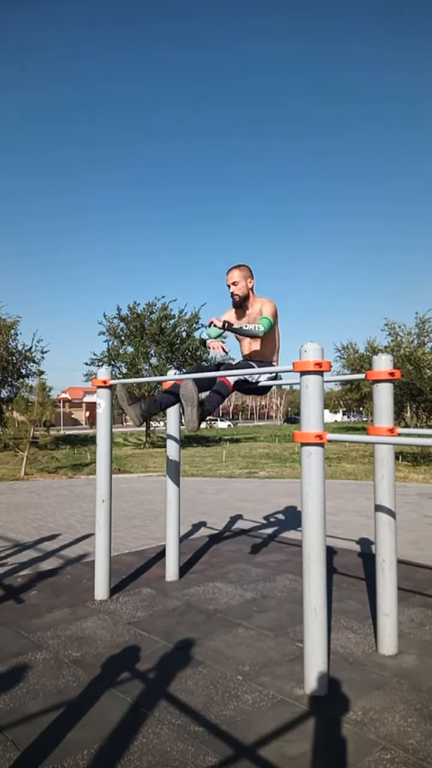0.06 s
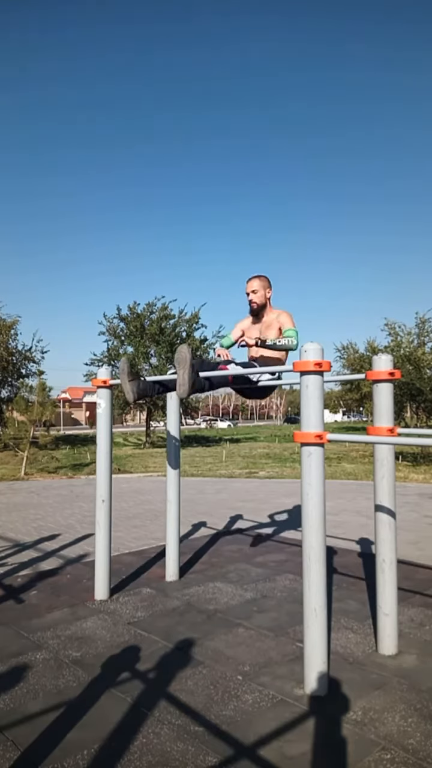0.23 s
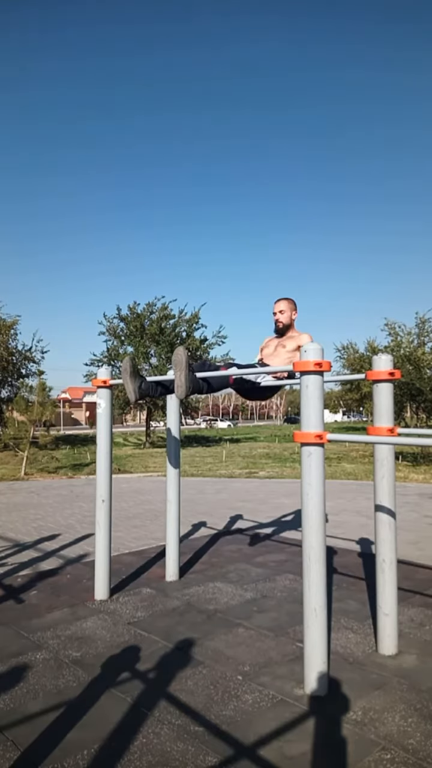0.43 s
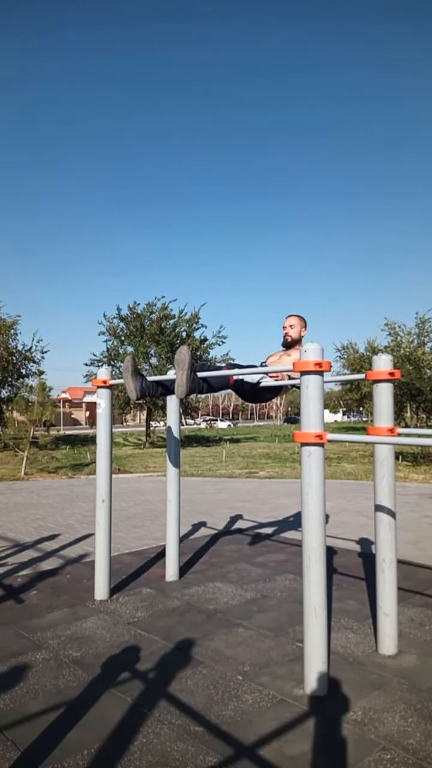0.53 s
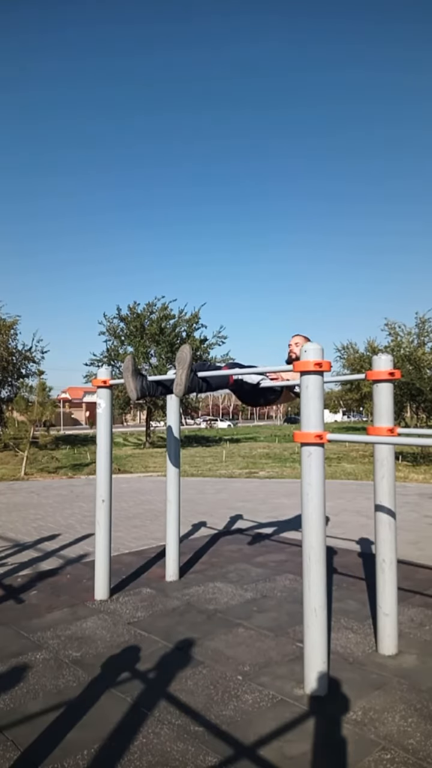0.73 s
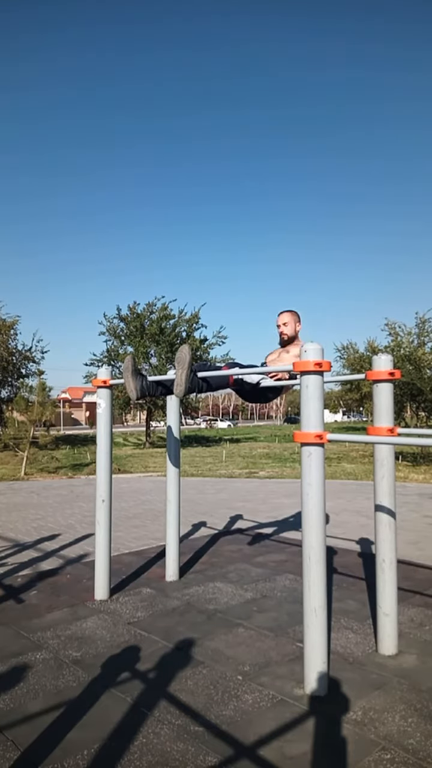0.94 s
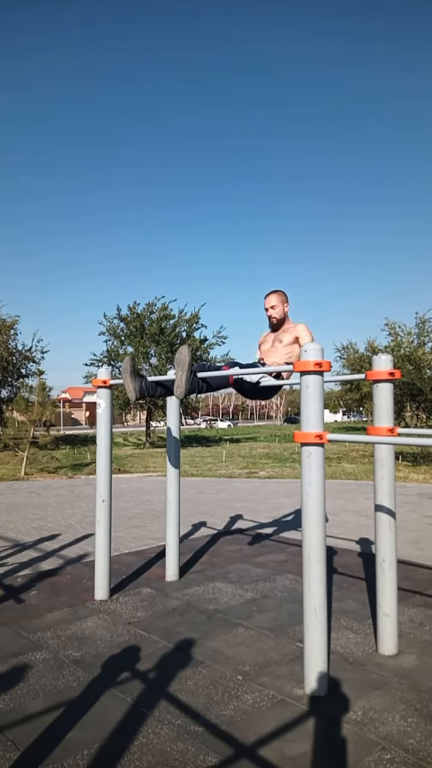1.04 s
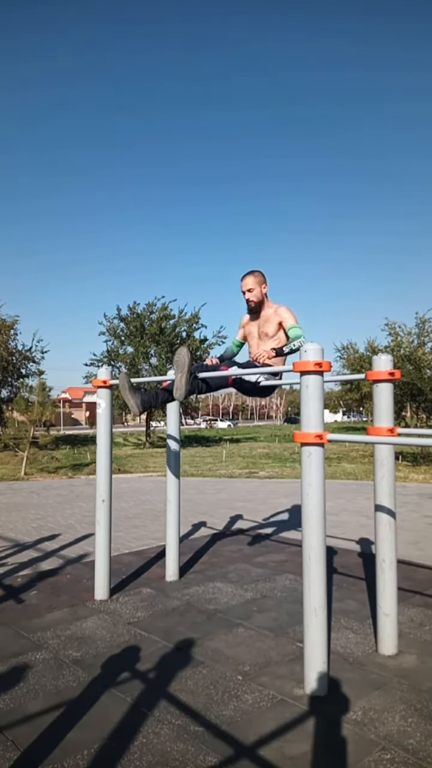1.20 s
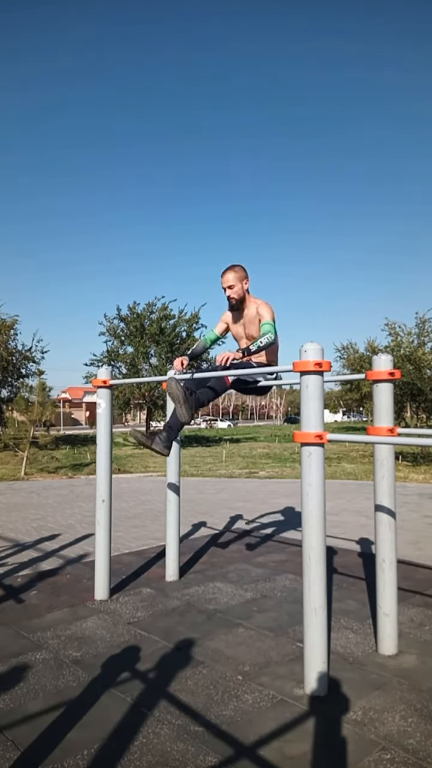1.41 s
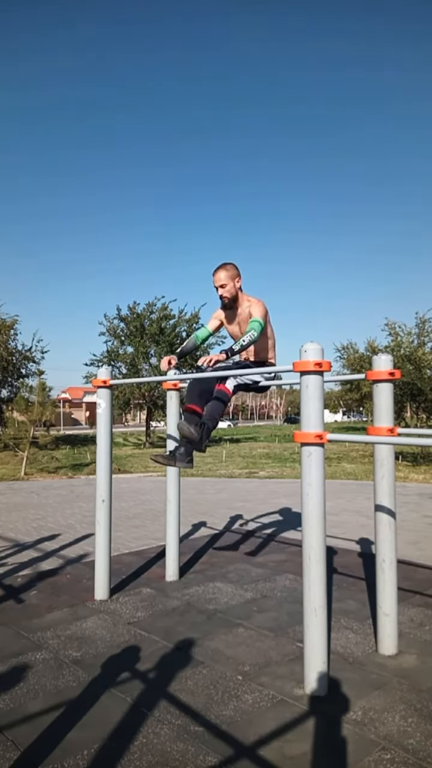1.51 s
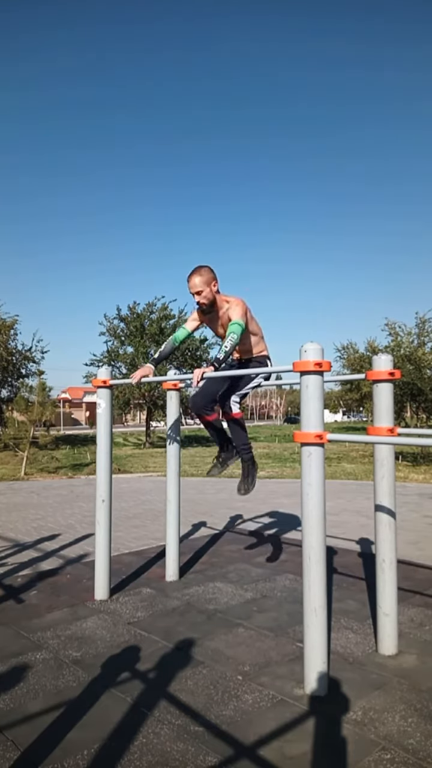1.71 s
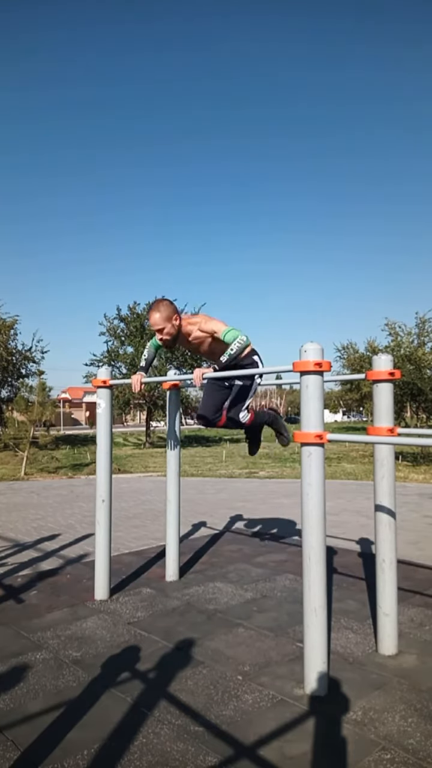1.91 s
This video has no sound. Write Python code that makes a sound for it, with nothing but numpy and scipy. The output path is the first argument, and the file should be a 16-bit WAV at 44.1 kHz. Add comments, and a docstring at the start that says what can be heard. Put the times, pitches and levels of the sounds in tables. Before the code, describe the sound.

A quick double metallic clatter of hollow parallel bars, the second knock louder, fades into a short ring. Low distant traffic and soft hiss continue outdoors, with small dry ticks and a high clink late; single-channel, little echo.

```python
"""Steel parallel bars in a park

An athlete drops back onto steel parallel bars: the bars clank in their loose clamps, shudder,
then knock home and ring briefly. A small metal piece clinks near the end, and very faintly early on.
Metal sounds are sums of dying sine waves and bursts of coloured noise, with a faint echo added.
Distant traffic rumbles and hisses underneath, made of noise whose level keeps changing."""
import sys
import numpy as np
from scipy import signal
from scipy.fft import rfft, irfft
from scipy.io import wavfile
from scipy.ndimage import uniform_filter1d

SR = 44100  # samples per second
rng = np.random.default_rng(int(sys.argv[2]) if len(sys.argv) > 2 else 0)


def to_wav(sig):
    """Store sig (one row per channel, or 1-D mono) as 16-bit WAV at the path in sys.argv[1].

    Samples outside -1..1 are clipped; the rate is SR.
    """
    pcm = np.clip(np.atleast_2d(sig), -1, 1) * 32767
    pcm = np.round(pcm).astype(np.int16)
    wavfile.write(sys.argv[1], SR, pcm.T)  # frames by channels


N = 85995  # length of the scene in samples

# In all tables, t60 is the time a sound takes to die away by 60 dB.


def amp(db):
    """Turn decibels into a gain."""
    return 10 ** (np.asarray(db) / 20)


def unit(x):
    """Scale a sound to an average (rms) strength of 1."""
    return x / np.sqrt(np.mean(x ** 2) + 1e-20)


def along(points, hz):
    """Read a curve of (frequency, value) points, with frequency on a log axis."""
    point_hz, values = np.transpose(points)
    return np.interp(np.log(hz + 1), np.log(point_hz + 1), values)


def level(rows):
    """Turn (time, level in dB) points into a gain for every sample."""
    seconds = np.arange(N) / SR
    return amp(np.interp(seconds, *np.transpose(rows)))


def tilt(hz, slope_db):
    """Brighten for a harder contact or darken for a softer one, in dB per octave around 1500 Hz."""
    octaves = np.log2(np.clip(hz, 400, 5000) / 1500)
    return amp(slope_db * octaves)


def noise(spectrum, slope_db=0):
    """Shape random noise with a colour curve and a tilt, then scale it to rms 1."""
    hz = np.fft.rfftfreq(N, 1 / SR)
    white = rfft(rng.standard_normal(N))
    coloured = white * amp(along(spectrum, hz)) * tilt(hz, slope_db)
    return unit(irfft(coloured, N))


def fade(t, t60):
    """Die away exponentially, falling 60 dB in t60 seconds."""
    return np.exp(-np.log(1000) * t / t60)


def rise(t, seconds):
    """Start softly; the given seconds are the time constant of the attack."""
    return 1 - np.exp(-t / max(seconds, 1e-4))


def ring(t, hz, t60):
    """One dying mode (a pure tone of the metal), starting at a random phase."""
    return np.sin(2 * np.pi * (hz * t + rng.random())) * fade(t, t60)


def die_by_band(x, t60s):
    """Let each frequency of a sound die at its own speed."""
    hz, t, bands = signal.stft(x, SR, nperseg=256)
    t60 = along(t60s, hz)[:, None]
    return signal.istft(bands * fade(t, t60), SR, nperseg=256)[1][:len(x)]


def add(track, s, sound):
    """Mix a sound into the track, starting at time s in seconds."""
    i = round(s * SR)
    track[i:i + len(sound)] += sound[:N - i]


def patchy(x, depth_db):
    """Let each region of the spectrum swell and sink on its own."""
    bands = signal.stft(x, nperseg=512)[2]
    field = rng.standard_normal(bands.shape)
    field = uniform_filter1d(field, size=6, axis=0)  # smooth across frequency
    field = uniform_filter1d(field, size=10, axis=1)  # smooth across time
    gains = amp(depth_db * unit(field))
    return unit(signal.istft(bands * gains, nperseg=512)[1][:N])


def traffic():
    """A narrow, swelling rumble under the soft hiss of far roads and leaves."""
    # how the rumble swells: (time [s], level [dB])
    rumble_level = [(0.0, -50.5), (0.336, -62), (0.362, -58), (0.472, -61), (0.542, -54), (0.57, -62),
                    (0.732, -55), (0.754, -62), (1.026, -48.5), (1.052, -57.5), (1.194, -53), (1.21, -57.5),
                    (1.27, -51), (1.656, -59.5), (1.814, -47), (1.868, -63), (1.922, -56.5), (1.95, -61)]
    # colour of the rumble: (frequency [Hz], relative level per Hz [dB])
    rumble_colour = [(20, -25), (42, -19.5), (62, -11.5), (78, 4.5), (95, -5.5), (122, -8), (155, -16),
                     (210, -23), (400, -66)]
    # how the hiss changes: (time [s], level [dB])
    hiss_level = [(0, -58.5), (.2, -60.5), (.7, -60), (.9, -60.5), (1.1, -58.5), (1.32, -58.5),
                  (1.62, -58.5), (1.95, -59)]
    # colour of the hiss: (frequency [Hz], relative level per Hz [dB])
    hiss_colour = [(30, -29.5), (170, 9.5), (340, -1.5), (600, 1.5), (1100, 0.5), (1800, -2), (3000, -10),
                   (4500, -15), (6500, -14), (7400, -29), (8600, -45), (10800, -32), (13200, -62),
                   (15300, -27)]
    rumble = noise(rumble_colour)
    # even out the noise's own swells, so that the level table sets them
    own_swell = np.sqrt(np.abs(uniform_filter1d(rumble ** 2, size=2200)) + 1e-6)
    steady_rumble = rumble / own_swell
    hiss = patchy(noise(hiss_colour), depth_db=1.75)
    return level(rumble_level) * steady_rumble + level(hiss_level) * hiss


def park(x):
    """Ground, posts and trees scatter a weak echo tail, made of dying noise."""
    # how fast the echo dies: (frequency [Hz], t60 [s])
    echo_t60 = [(200, 0.23), (1000, 0.29), (3000, 0.22), (8000, 0.46)]
    tail = die_by_band(rng.standard_normal(SR // 2), echo_t60)
    return signal.fftconvolve(x, tail / np.linalg.norm(tail))[:N]


def ticks():
    """Short, dry ticks of the bars under a shifting grip: bursts of dying noise."""
    # the faint ticks: (time [s], level [dB])
    tick_times = [(1.718, -61), (1.875, -61)]
    # colour of a tick: (frequency [Hz], relative level per Hz [dB])
    tick_colour = [(2500, -28), (4500, -4), (6300, 8), (7200, -16), (8500, -30), (15000, -32)]
    out, t = np.zeros(N), np.arange(SR // 10) / SR
    for s, db in tick_times:
        burst = noise(tick_colour)[:len(t)] * fade(t, t60=0.061)
        add(out, s, amp(db) * burst)
    return out


def clinks():
    """A small piece of metal touches the bar: high, short modes and a little noisy scrape."""
    # the touches: (time [s], level [dB])
    touches = [(0.309, -63.5), (1.8232, -60), (1.828, -49)]
    # tones of the small piece: (frequency [Hz], relative level [dB], t60 [s])
    clink_modes = [(6023, 1.5, 0.11), (7200, 4.5, .03), (7500, -8, 0.089), (8300, -9.5, 0.11),
                   (9787, -6, .05), (10920, -9, 0.037), (12000, -18, .055), (15530, -19, 0.054)]
    # colour of the scrape: (frequency [Hz], relative level per Hz [dB])
    scrape_colour = [(2000, -30), (5000, -3), (5950, 6), (7300, -1), (8700, -9), (11800, -3), (13300, -29),
                     (14400, -14), (15500, 2.5)]
    scrape_db, scrape_t60, rise_s = 3.5, 0.066, 0.00085
    out, t = np.zeros(N), np.arange(SR // 4) / SR
    for s, db in touches:
        tones = sum(amp(mode_db) * ring(t, hz, t60) for hz, mode_db, t60 in clink_modes)
        scrape = amp(scrape_db) * noise(scrape_colour)[:len(t)] * fade(t, scrape_t60)
        add(out, s, amp(db) * rise(t, rise_s) * (tones + scrape))
    return out


def mode(t, hz, t60, swell_s):
    """One mode that swells from rest as the blow spreads through the frame, then dies."""
    return np.sin(2 * np.pi * hz * t) * fade(t, t60) * rise(t, swell_s) ** 2


def clatter(t, slope_db):
    """The dense, quickly dying rattle of one contact in a clamp, made of noise."""
    # colour of the rattle: (frequency [Hz], relative level per Hz [dB])
    clatter_colour = [(100, -50), (260, -9.5), (410, -10.5), (540, 4.5), (680, -8.5), (800, -1.5),
                      (900, -11.5), (1080, 3.5), (1270, -7.5), (1600, -0.5), (2450, -2.5), (3200, -2),
                      (4300, -5), (5300, -7), (6350, -2), (7400, -24), (8800, -36.5), (11000, -34),
                      (13500, -53), (15500, -39)]
    # how fast it dies: (frequency [Hz], t60 [s])
    clatter_t60 = [(300, 0.17), (900, 0.33), (1800, 0.15), (5000, 0.089), (12000, 0.17)]
    return die_by_band(noise(clatter_colour, slope_db)[:len(t)], clatter_t60)


def cluster(t, hz, spread_hz, t60, count):
    """Close modes that beat against each other, or a lone one if there is no spread."""
    if spread_hz < 1:
        return ring(t, hz, t60)
    places = (np.arange(count) + rng.random(count)) * 2 / count - 1  # scattered from -1 to 1
    return sum(ring(t, hz + spread_hz * place, t60) for place in places) / np.sqrt(count)


def bar_ring(t, ring_db, slope_db):
    """The bar's long ring: clusters of close modes that start softly together."""
    # the clusters: (frequency [Hz], spread to each side [Hz], relative level [dB], t60 [s])
    bar_clusters = [(1940, 35.5, -19.5, 0.76), (2067, 29.5, -22.5, 0.78), (2286, 0, -15.5, 0.53),
                    (2360, 47.5, -22, 0.82), (3764, 120, -17, 0.44), (4740, 54.5, -38, 0.99),
                    (6100, 149, -8.5, 0.22), (6460, 84, -28, 0.2)]
    total = np.zeros(len(t))
    for hz, spread_hz, db, t60 in bar_clusters:
        gain = amp(db + ring_db) * tilt(hz, slope_db)
        total += gain * cluster(t, hz, spread_hz, t60, count=7)
    return total * rise(t, 0.0047)


def knocks():
    """Each blow rattles the clamp, rings the frame by its kind of contact and sets the bar singing."""
    # blows of the bar in its clamps: (time [s], level [dB], clatter level [dB], long ring level [dB],
    # tilt [dB per octave], rise time constant [s], contact [0 slip, 1 shudder, 2 thud, 3 seat])
    blows = [(0.2314, -35, 1, -5.5, 4, 0.0017, 0), (.299, -40.5, 0.11, 5, -2, 0.0088, 1),
             (.3628, -29, -0.87, -4, 0, 0.0012, 2), (0.3702, -28, -1.4, -1.5, 2.5, 0.00072, 3)]
    # modes of the hollow steel frame: (frequency [Hz], t60 [s], swell time constant [s],
    # then the relative level on a slip [dB], shudder [dB], thud [dB], seat [dB])
    frame_modes = [(323, 0.18, 0.086, 20, -9, -29, 10), (426, 0.052, 0.0011, -2.5, -16, -34, -48),
                   (503, 0.095, 0.015, 5, -6, -18, -32), (556.6, 0.075, 0.00067, -7, 11.5, 4.5, -35),
                   (793, 0.061, 0.021, 18, -14, -28, -24), (824, 0.41, 0.0027, -15, -28, -29, -19.5),
                   (1018, 0.23, .02, -22, -2, -39, -3), (1038, .12, 0.0014, -25, 2, -15, 0),
                   (1086.4, 0.098, 0.0014, 0.5, -21, 0, -22), (1128, 0.17, 0.0052, -16, -37, -21, 0.5),
                   (1157, 0.22, 0.0012, -27, -18, -23, -14.5), (1488, 0.18, 0.0016, -10, -31, -7, -20.5),
                   (1556, 0.11, 0.0017, -19, -7, -26, -3), (1754, 0.084, 0.0023, -35, -11, -28, -8),
                   (1959, 0.15, 0.004, -21, -1.5, -1, -6), (2144, 0.37, 0.013, -40, -14, -30, -10.5),
                   (2360, 0.16, 0.0013, -8, -19, -16, -8), (2459, 0.27, 0.0025, -10, -8.5, -26, -11.5),
                   (2570, 0.063, .003, -28, -26, -9, 0), (2963, .14, 0.0035, -9, -22, -26, -8),
                   (3941, 0.057, 0.0065, 4, -17, -19, -13), (4027, 0.22, 0.0076, -8, -17, -21, -11),
                   (4640, 0.053, 0.0036, -22, -27, -22, -7), (5110, 0.11, .003, -7, -35, -22, -8.5)]
    # small rebounds that only clatter: (time [s], level [dB], tilt [dB per octave])
    rebounds = [(.239, -34.5, 0.5), (0.25, -42, -4.5), (0.3091, -45.5, -9.5), (.318, -48, -3),
                (0.4013, -39.5, -2)]
    out, t = np.zeros(N), np.arange(SR * 3 // 4) / SR
    modes = np.array([mode(t, *row[:3]) for row in frame_modes])
    strengths = amp(np.array(frame_modes)[:, 3:].T)  # one row per kind of contact
    for s, db, clatter_db, ring_db, slope_db, rise_s, contact in blows:
        frame = strengths[round(contact)] @ modes
        rattle = amp(clatter_db) * clatter(t, slope_db)
        bar = bar_ring(t, ring_db, slope_db)
        add(out, s, amp(db) * rise(t, rise_s) * (frame + rattle + bar))
    for s, db, slope_db in rebounds:
        add(out, s, amp(db) * rise(t, 0.00055) * clatter(t, slope_db))
    return out


def scene():
    """Mix the metal sounds, their faint echo and the traffic into one channel."""
    echo_db = -16
    metal = knocks() + clinks() + ticks()
    return (metal + amp(echo_db) * park(metal) + traffic())[None]


def record(dry):
    """Cut the treble off steeply above the band limit with a low-pass filter."""
    top_hz = 15850
    low_pass = signal.ellip(12, .1, 80, top_hz, fs=SR, output="sos")
    return signal.sosfilt(low_pass, dry)


dry = scene()
out = record(dry)
to_wav(out)
```